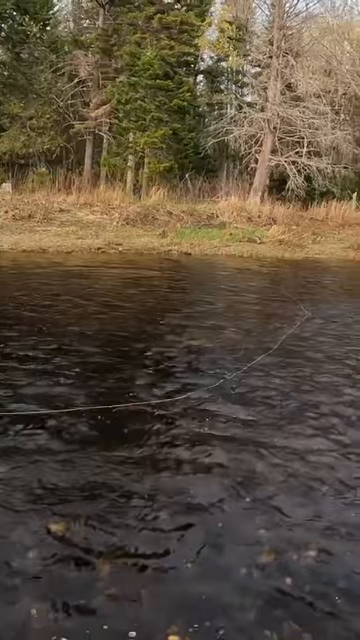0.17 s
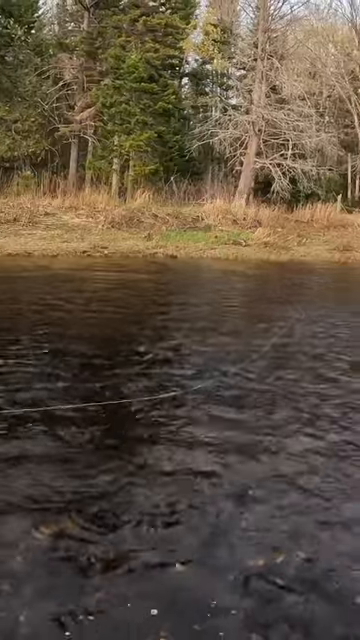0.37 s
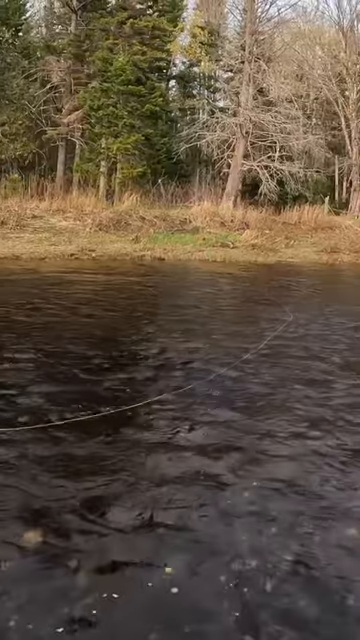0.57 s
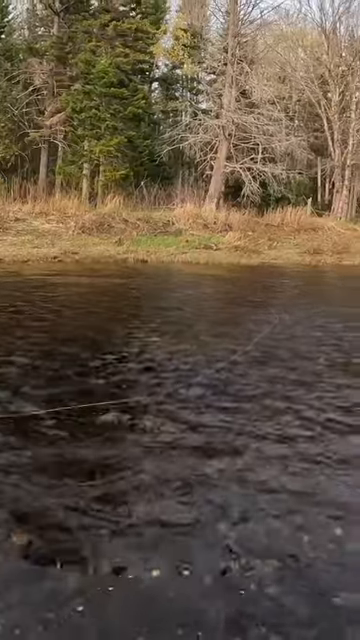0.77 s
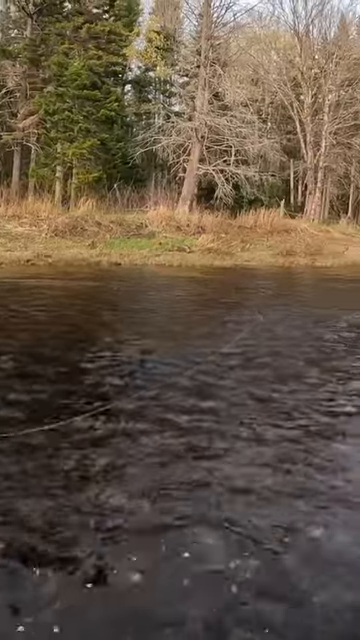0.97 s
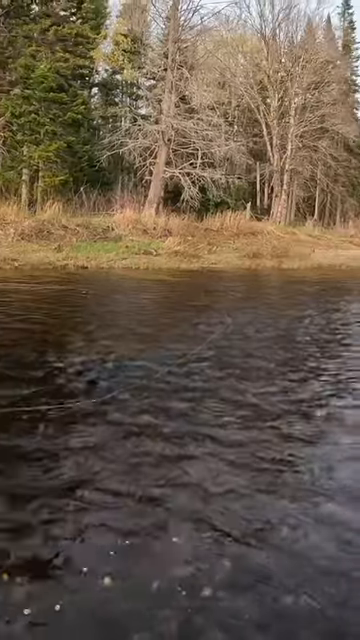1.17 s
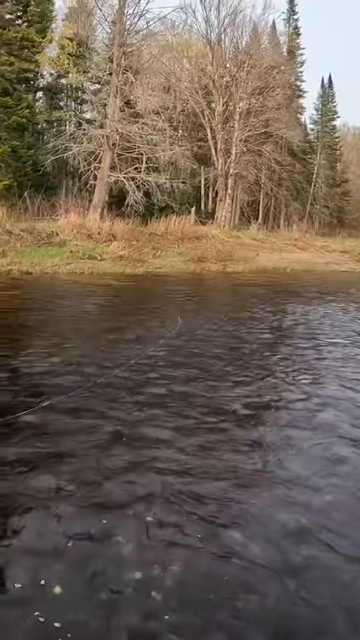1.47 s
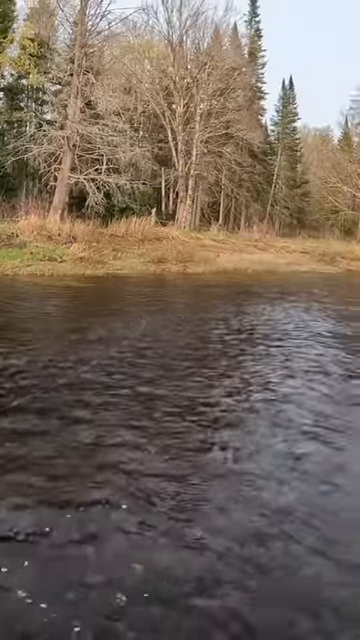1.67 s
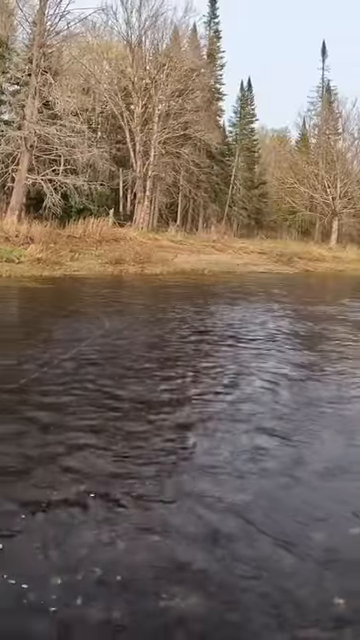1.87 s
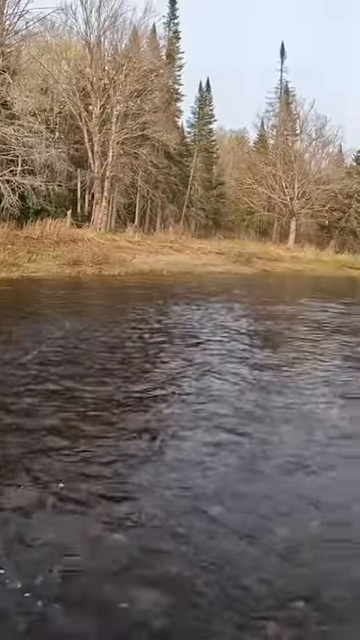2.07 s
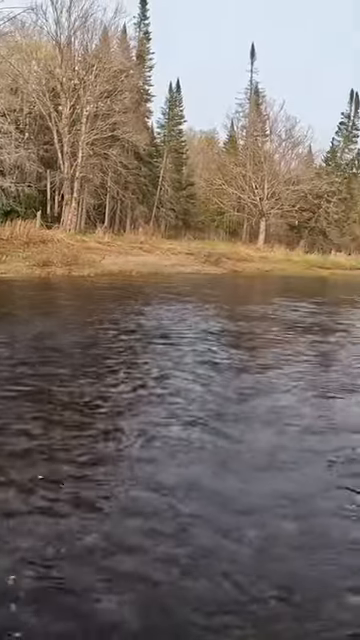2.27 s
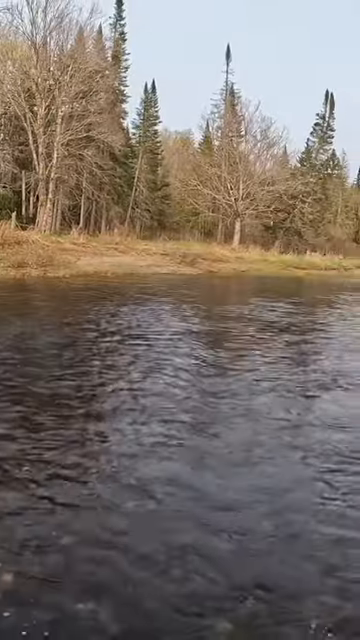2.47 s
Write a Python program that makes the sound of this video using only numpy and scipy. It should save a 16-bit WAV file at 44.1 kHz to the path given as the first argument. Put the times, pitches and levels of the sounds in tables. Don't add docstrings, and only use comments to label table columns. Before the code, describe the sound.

A bubbling, gurgling river current under low wind thumps, with small fishing reel clicks on the left

```python
import sys
import numpy as np
from scipy import signal
from scipy.io import wavfile

SR = 44100
rng = np.random.default_rng(int(sys.argv[2]) if len(sys.argv) > 2 else 0)


def file_out(sig):
    cols = np.atleast_2d(sig).T
    lim = np.clip(cols, -1, 1)
    pcm = np.round(lim * 32767).astype(np.int16)
    wavfile.write(sys.argv[1], SR, pcm)


def voltage_ratio(level):
    return 10 ** (np.asarray(level, float) / 20)


N = 115101

# time in seconds, level in dB.
WATER_STIR = [(0, 0), (.2, -8.5), (.33, 3), (.42, 2.5), (.68, 2.5), (.8, -4), (.9, 0.5), (.92, 12),
              (1.04, 5.5), (1.18, -2.5), (1.3, -0.5), (1.55, 3.5), (1.95, 2), (2.4, -1.5), (2.61, 0.5)]
# frequency in Hz, level in dB per Hz.
RIVER_COLOUR = [(260, -10), (380, -12), (500, -2), (1250, -2), (3000, -21.5), (7400, -26), (9500, -41.5),
                (12500, -33)]
# frequency in Hz, likeness from 0 to 1.
RIVER_LIKENESS = [(250, 0.3), (700, 0.96), (2000, 0.13), (4500, 1), (8000, 0.8), (13000, 0)]
# bubbles per second, lowest pitch in Hz, highest pitch in Hz,
# level in dB, spread of sizes in dB, cycles to die by 60 dB.
BUBBLE_SWARMS = [
    (31.2, 430, 660, -58.5, 3.5, 26),
    (172.9, 480, 950, -52, 2.5, 41.4),
    (450, 921, 2630, -58.5, 4.5, 20),
    (582, 2800, 8050, -70.5, 6.5, 22),
]
# time in seconds, level in dB, sharpness in dB.
WIND_GUST = [(0, -35, 13), (.4, -34.5, 8), (.68, -36, 7), (.95, -27, -1.5), (1.15, -35.5, 1),
             (1.5, -33.5, 10.5), (1.75, -36, 3.5), (1.95, -36.5, 15), (2.1, -38, 5.5), (2.2, -40, 4.5),
             (2.48, -35, -24), (2.61, -51.5, -8)]
# frequency in Hz, level in dB per Hz.
WIND_COLOUR = [(12, -43), (20, 9), (39, 3), (77, -7), (100, -11), (247, -30.5), (300, -37), (390, -84),
               (660, -120)]
# time in seconds, peak in dB, pitch in Hz.
WIND_BUFFETS = [
    (0.386, -20, 68),
    (0.786, -18, 69),
    (0.931, -17.5, 76),
    (1.035, -24, 46),
    (1.354, -25.5, 72),
    (1.47, -23.5, 59.6),
    (1.66, -19, 41.3),
    (1.827, -24.5, 46.3),
    (1.926, -24.5, 50.3),
]
BUFFET_DIRECTIONS = (1, -1, -1, -1, 1, -1, 1, -1, -1)
# start in seconds, peak in dB, pitch in Hz.
WIND_FLUTTERS = [(0.204, -48, 96.9), (0.359, -38, 105), (0.459, -33.5, 96), (0.578, -36, 108),
                 (0.712, -31, 96.9), (0.827, -37, 101), (1.33, -29.5, 105), (1.384, -30.5, 105),
                 (1.82, -33.5, 129), (1.923, -27.5, 120), (1.994, -37.5, 105), (2.059, -29, 96.9)]
# start in seconds, peak in dB, pitch in Hz.
SPRAY_TICKS = [(0.0204, -54, 5250), (0.0744, -52, 5810), (0.1248, -50.5, 6300), (0.137, -55, 5000),
               (0.162, -48, 4550), (0.443, -48, 4730), (0.654, -49, 5390), (0.9657, -49, 5000),
               (0.9744, -49, 6200), (1.0854, -54.5, 6960), (1.1294, -67, 4830), (1.2814, -54, 6360),
               (1.3254, -57, 5130), (1.3547, -56, 6820), (1.4147, -61, 5710), (1.72, -56, 4730),
               (1.7344, -58, 5750), (1.8576, -53, 4880), (1.9016, -54, 6140), (1.931, -54, 4800),
               (2.0308, -65, 5170), (2.153, -62, 5080), (2.163, -48, 5200), (2.197, -52, 4850),
               (2.2812, -50, 4990), (2.3276, -52.5, 5100)]
# start in seconds, peak in dB, pitch in Hz.
SMALL_BUBBLES = [(0.196, -50, 2500), (0.8195, -47, 2130), (0.8714, -42, 1860), (1.055, -48, 1870),
                 (1.0797, -39.5, 2200), (1.2106, -50, 1870), (1.342, -46, 3160), (1.3493, -41, 2050),
                 (1.529, -44.5, 2190), (1.5764, -42, 2000), (1.6393, -43, 1860), (1.6581, -42, 1910),
                 (1.7269, -37.5, 2290), (1.8352, -40, 2040), (2.1084, -46, 2060), (2.1936, -38.5, 2360),
                 (2.3295, -44.5, 2240), (2.467, -54, 1860)]
# start in seconds, peak in dB, pitch in Hz.
LONE_BUBBLES = [
    (0.773, -40, 840),
    (1.477, -34, 794),
    (1.665, -33, 1320),
    (2.047, -49, 1220),
    (2.094, -42, 1500),
    (2.299, -40, 1195),
]
# start in seconds, peak in dB, pitch in Hz.
DROPLETS = [(0.241, -44.5, 2950), (0.36, -48.5, 4270), (0.409, -51, 4450), (0.4605, -33.5, 3540),
            (0.624, -47, 3700), (0.7066, -48.5, 5060), (0.8586, -49, 5070), (0.9734, -49, 4180),
            (1.072, -47, 3050), (1.2868, -46, 3650), (1.4255, -45.5, 3230), (1.485, -47.5, 7300),
            (1.652, -51, 3150), (1.841, -56, 3500), (1.9839, -44.5, 6350), (2.1749, -47, 2840),
            (2.5152, -48, 5940)]
# start in seconds, peak in dB, pitch in Hz.
MIDDLE_BUBBLES = [(0.1987, -41.5, 1120), (0.2408, -42.5, 920), (0.268, -30.5, 1003), (0.3855, -36.5, 1140),
                  (0.4617, -34, 980), (0.6325, -40, 1220), (0.788, -39, 1266), (1.1208, -32.5, 1216),
                  (1.1649, -41, 880), (1.2242, -41, 1165), (1.259, -37.5, 1006), (1.3512, -34, 1160),
                  (1.4286, -39, 1156), (1.5958, -37, 1870), (1.6548, -32, 1196), (1.715, -37, 1700),
                  (1.7683, -40, 994), (1.9602, -37.5, 1160), (2.1314, -34.5, 1334), (2.464, -34.5, 1306),
                  (2.508, -33.5, 1130), (2.604, -41, 1250)]
# start in seconds, peak in dB, pitch in Hz.
LARGE_BUBBLES = [(0.03, -34.5, 490), (0.075, -34, 501), (0.16, -45.5, 521), (0.286, -35.5, 521),
                 (0.386, -38, 488), (0.408, -32.5, 455), (0.464, -35, 325), (0.495, -37.5, 693),
                 (0.556, -41.5, 392), (0.653, -37, 780), (0.838, -39.5, 485), (0.897, -41, 520),
                 (0.985, -37, 690), (1.119, -40, 351), (1.164, -25.5, 638), (1.226, -34, 830),
                 (1.326, -40, 465), (1.553, -39, 491), (1.682, -38, 435), (1.72, -33.5, 546),
                 (1.786, -30, 541), (1.843, -35.5, 629), (1.927, -43, 564), (1.975, -40.5, 568),
                 (2.121, -35.5, 515), (2.145, -40.5, 489), (2.243, -42.5, 695), (2.297, -39.5, 423),
                 (2.575, -38.5, 632)]
# start in seconds, peak in dB, brightness in dB, pitch factor.
CLICKS_TURNING_OUT = [
    (.308, -37.5, -18, 0.94),
    (.534, -40.5, 6.5, 0.87),
    (.565, -38, 4.5, 0.98),
    (.608, -39, 2.5, 0.93),
]
# start in seconds, peak in dB, brightness in dB, pitch factor.
CLICKS_TURNING_BACK = [
    (2.5292, -39, 1.7, 1.016),
    (2.5748, -39.5, 2.4, 0.99),
    (2.6045, -40.5, 0.73, 1.02),
]
# frequency in Hz, level in dB, seconds to die by 60 dB.
RINGING_OUT = [(5070, -4.5, 0.011), (5920, -2.5, 0.011), (7640, 1, 0.0067), (9250, -4.5, 0.0058),
               (12400, -3, 0.0038), (14700, -15.5, 0.0066)]
# frequency in Hz, level in dB, seconds to die by 60 dB.
RINGING_BACK = [(5830, 5.5, 0.012), (6120, -12, 0.024), (7200, 1.5, 0.0056), (11600, -5, 0.0028),
                (14600, -11, 0.0086)]

RISE_PER_CYCLE = 0.00708
BUBBLE_STIR_SHARE, HISS_STIR_SHARE = 0.49, 0.53
WIND_PAN_DB = -4


def rms_one(x):
    return x / np.sqrt(np.mean(x ** 2) + 1e-20)


def in_time(rows):
    s, *columns = np.transpose(rows)
    return [np.interp(np.arange(N) / SR, s, c) for c in columns]


def at_hz(points, hz):
    table_hz, values = np.transpose(points)
    return np.interp(np.log(hz), np.log(table_hz), values)


def band(x, low_hz, high_hz):
    sos = signal.butter(2, [low_hz, min(high_hz, .45 * SR)], "band", fs=SR, output="sos")
    return signal.sosfilt(sos, x)


def one_side(x, hz, kind, order):
    return signal.sosfilt(signal.butter(order, hz, kind, fs=SR, output="sos"), x)


def pan(db):
    return voltage_ratio(np.array([[db / 2], [-db / 2]]))


def drift(rate):
    r = np.exp(-80 * np.pi * rate / SR)
    slow = signal.lfilter([1], [1, -2 * r, r * r], rng.standard_normal(N // 40 + 2002))
    slow = slow[2000:]
    return np.interp(np.arange(N) / 40, np.arange(len(slow)), rms_one(slow))


def add(out, s, sound):
    i = max(int(s * SR), 0)
    out[..., i:i + sound.shape[-1]] += sound[..., :max(N - i, 0)]


def banded_noise(spectrum, edges, likeness, patchy_db, rate):
    out, together = 0, drift(rate / 2)
    white = rng.standard_normal((2, 2, N + SR))
    for k, (low, high) in enumerate(zip(edges, edges[1:])):
        mid, side = band(white[k % 2], low, high)[:, SR:]
        hz = np.sqrt(low * high)
        alike = np.clip(likeness(hz), 0, 1)
        gain = voltage_ratio(at_hz(spectrum, hz) + patchy_db * (.5 * together + drift(rate)))
        stereo = np.sqrt(1 + alike) * mid + np.sqrt(1 - alike) * side * [[1], [-1]]
        out = out + gain * stereo
    return rms_one(out)


def bubble(hz, cycles, rise=RISE_PER_CYCLE):
    turns = np.arange(int(cycles / hz * SR)) * hz / SR
    opening = 1 - np.exp(-(turns / (0.35 + hz / 5000)) ** 2)
    return opening * voltage_ratio(-60 * turns / cycles) * np.sin(2 * np.pi * turns * (1 + rise * turns / 2))


def crack(t60, low_hz, high_hz):
    noise, t = rng.standard_normal((3, 2000)), np.arange(2000) / SR
    puff = (noise[0] + 0.75 * noise[1:]) * voltage_ratio(-60 * t / t60) * np.minimum(t * low_hz, 1)
    return band(band(puff, low_hz, high_hz), low_hz / 2, high_hz)


def river(stir_db):
    edges = 240 * 2 ** np.arange(0, 5.8, 1 / 3)
    rush = voltage_ratio(-55) * banded_noise(RIVER_COLOUR, edges, lambda hz: at_hz(RIVER_LIKENESS, hz), .8, 20.0)
    for hz in (2200, 8500):
        bright = one_side(rush, hz, "high", 1)
        rush = rush + bright * (voltage_ratio(HISS_STIR_SHARE * stir_db) - 1)
    return one_side(rush, 13000, "low", 8)


def swarms(stir_db):
    out = np.zeros((2, N))
    for rate, low_hz, high_hz, db, spread_db, cycles in BUBBLE_SWARMS:
        layer, draws, clump = np.zeros((2, N)), rng.random((1500, 5)), drift(20.0)
        for when, pitch, size, side, life in draws[:int(rate * N / SR)]:
            size_db = spread_db * min(-np.log(size), 2.5)
            gain = voltage_ratio(size_db + 2.0 * clump[int(when * N)]) * pan(1 + 8 * (side - .5))
            hz = low_hz * (high_hz / low_hz) ** pitch ** 1.4
            add(layer, when * N / SR, gain * bubble(hz, cycles * (.5 + life), RISE_PER_CYCLE * 2 * life))
        out += voltage_ratio(db) * rms_one(layer)
    return out * voltage_ratio(BUBBLE_STIR_SHARE * stir_db)


def foam_crackle(stir_db):
    per_s, spread_db, puff_s, limits_hz = 150, 3.0, 0.0021, (2200, 7000)
    born = (rng.random(N) < per_s / SR) * voltage_ratio(spread_db * np.minimum(rng.exponential(1, N), 3))
    puffs = signal.lfilter([1], [1, -np.exp(-1 / (puff_s * SR))], born + 1e-18) * rng.standard_normal(N)
    ticks = rms_one(band(band(puffs, *limits_hz), *limits_hz))
    return voltage_ratio(-75 + BUBBLE_STIR_SHARE * stir_db) * pan(6.0) * ticks


def wind():
    db, sharp_db = in_time(WIND_GUST)
    noise = banded_noise(WIND_COLOUR, 16 * 2 ** np.arange(0, 4.6, .5), lambda hz: 0.71, 2.92, 9.2)
    split_hz = 93
    top, low = one_side(noise, split_hz, "high", 2), one_side(noise, split_hz, "low", 2)
    out = voltage_ratio(db) * (low - top * voltage_ratio(sharp_db - sharp_db.mean()))
    for (s, peak_db, hz), sign in zip(WIND_BUFFETS, BUFFET_DIRECTIONS):
        turns = np.arange(-SR / hz, SR / hz) * hz / SR
        thump = np.exp(-(turns / 0.37) ** 2) * np.cos(2 * np.pi * turns)
        add(out, s - .5 / hz, sign * voltage_ratio(peak_db) * thump)
    return out * pan(WIND_PAN_DB)


def wind_flutters():
    out = np.zeros((2, N))
    for s, db, hz in WIND_FLUTTERS:
        turns = np.arange(-3 * SR / hz, 3 * SR / hz) * hz / SR
        puff = np.exp(-(turns / 1.23) ** 2) * np.sin(2 * np.pi * turns)
        add(out, s - 1.5 / hz, voltage_ratio(db - 6) * pan(WIND_PAN_DB) * puff)
    return out


def spray():
    out = np.zeros((2, N))
    for s, db, hz in SPRAY_TICKS:
        add(out, s, voltage_ratio(db) * pan(3.5) * bubble(hz, 30.0))
        add(out, s, voltage_ratio(db + 2) * pan(3.5) * crack(0.013, 0.63 * hz, 1.39 * hz))
    return out


def droplets():
    out, sides = np.zeros((2, N)), pan(1.5)
    for s, db, hz in DROPLETS:
        add(out, s, voltage_ratio(db) * sides * bubble(hz, 46))
        add(out, s, voltage_ratio(db - 3.5) * sides * crack(0.025, 2530, 7000))
    return out


def single_bubbles():
    out = np.zeros((2, N))
    for s, db, hz in list(SMALL_BUBBLES) + list(LONE_BUBBLES):
        add(out, s, voltage_ratio(db - 3) * pan(1.5) * bubble(hz, 51))
    return out


def gurgle():
    out = np.zeros((2, N))
    for (s, db, hz), side in zip(LARGE_BUBBLES, rng.standard_normal(len(LARGE_BUBBLES))):
        add(out, s, voltage_ratio(db + 1.5) * pan(.5 * side) * bubble(hz, 38.4, 0.01164))
        add(out, s, voltage_ratio(db + 5.5) * crack(0.029, 430, 1440)[0])
    cycles, companion_db, latest_s, pitch_spread = 33.2, -3, 0.00698, 0.27
    for (s, db, hz), draw in zip(MIDDLE_BUBBLES, rng.random((len(MIDDLE_BUBBLES), 5))):
        sides = pan(2 * draw[0] - 1)
        add(out, s, voltage_ratio(db) * sides * bubble(hz, cycles))
        for late, pitch in draw[1:].reshape(2, 2):
            other_hz = hz * (1 + pitch_spread * (2 * pitch - .5))
            add(out, s + latest_s * late, voltage_ratio(db + companion_db) * sides * bubble(other_hz, cycles))
    return out


def line_in_rings():
    out, t = np.zeros((2, N)), np.arange(SR // 5) / SR
    grains = rng.standard_normal((2, len(t)))
    grains = grains * voltage_ratio(3.2 * drift(200.0)[:len(t)] - 60 * t / 0.067)
    rustle = band((grains + grains[0]) * np.minimum(t / 0.0045, 1), 6300, 7600)
    add(out, .911, voltage_ratio(-39.5) * rustle)
    since, limits_hz = np.arange(N) / SR - .6, (8300, 13500)
    swell = np.clip(since / .02, 0, 1) * np.exp(-(since / .15) ** 2)
    gain = voltage_ratio(-75 + 2 * drift(60.0)) * swell
    noise = rng.standard_normal((2, N)) + rng.standard_normal(N)
    return out + gain * rms_one(band(band(noise, *limits_hz), *limits_hz))


def pawl_strike(modes, bright_db, pitch, crack_db):
    t, rings = np.arange(3000) / SR, 0
    for hz, mode_db, t60 in modes:
        level_db = mode_db + bright_db * (hz > 10000) + 2 * rng.standard_normal()
        ring_hz = hz * pitch * (1 + rng.standard_normal() / 150)
        phase = [[0], [rng.normal(0, hz / 11000)]]
        rings = rings + voltage_ratio(level_db - 60 * t / t60) * np.sin(2 * np.pi * ring_hz * t + phase)
    hit = voltage_ratio(-0.5) * rings * np.minimum(t / 0.00027, 1)
    add(hit, 0, voltage_ratio(crack_db) * crack(0.038, 3500, 9300))
    return hit


def reel():
    out = np.zeros((2, N))
    turning_out = (CLICKS_TURNING_OUT, RINGING_OUT, -6, -13)
    turning_back = (CLICKS_TURNING_BACK, RINGING_BACK, -12.5, -14)
    for clicks, modes, crack_db, bounce_db in (turning_out, turning_back):
        for s, db, bright_db, pitch in clicks:
            bounce_s = 0.0083 * rng.uniform(.7, 0.71)
            for delay, loss_db in ((0, 0), (bounce_s, bounce_db)):
                add(out, s + delay, voltage_ratio(db + loss_db) * pawl_strike(modes, bright_db, pitch, crack_db))
    return (out + line_in_rings()) * pan(5.5)


def scene():
    stir_db, = in_time(WATER_STIR)
    stir_db = stir_db - stir_db.mean()
    near_water = wind() + gurgle() + droplets()
    all_round = swarms(stir_db) + river(stir_db) + reel()
    return near_water + all_round + spray() + single_bubbles() + wind_flutters() + foam_crackle(stir_db)


def roll_off(x):
    return signal.sosfilt(signal.butter(12, 15760, fs=SR, output="sos"), x)


def record(dry):
    mix = one_side(dry, 13800, "low", 3)
    return roll_off(mix)


dry = scene()
out = record(dry)
file_out(out)
```